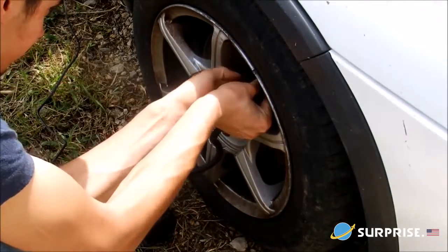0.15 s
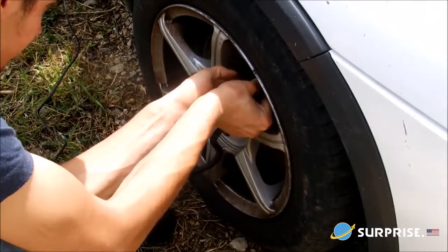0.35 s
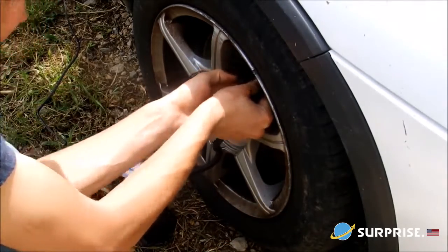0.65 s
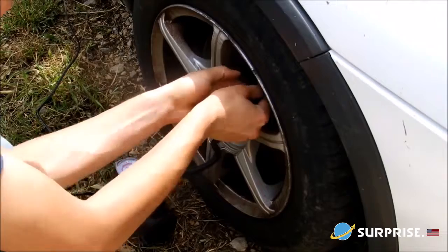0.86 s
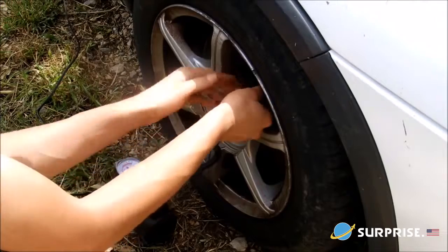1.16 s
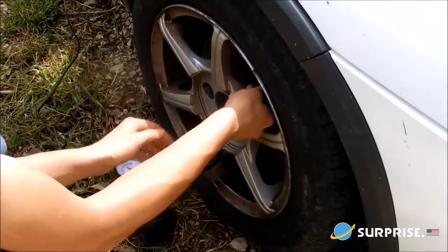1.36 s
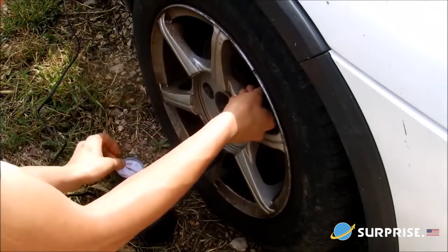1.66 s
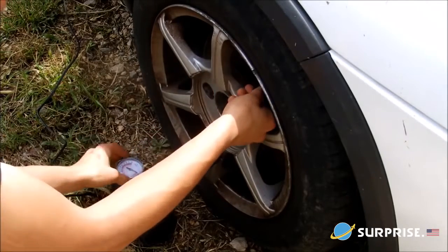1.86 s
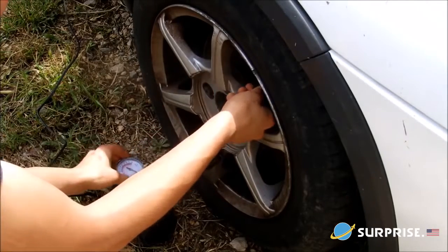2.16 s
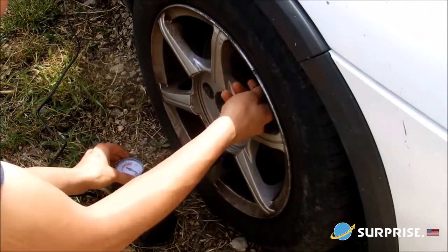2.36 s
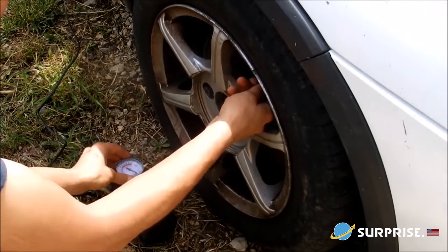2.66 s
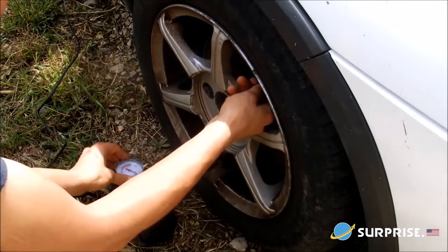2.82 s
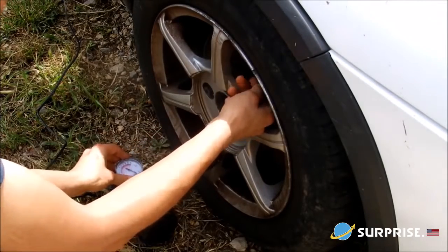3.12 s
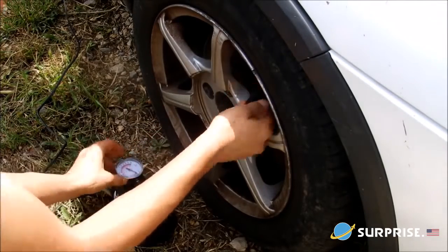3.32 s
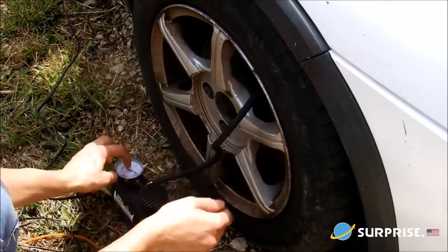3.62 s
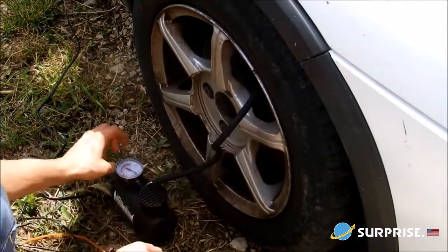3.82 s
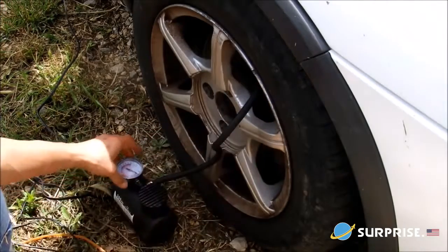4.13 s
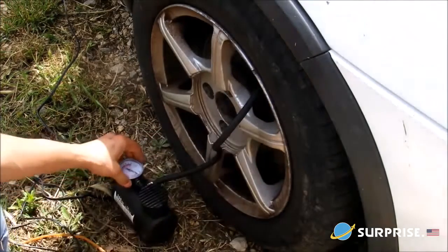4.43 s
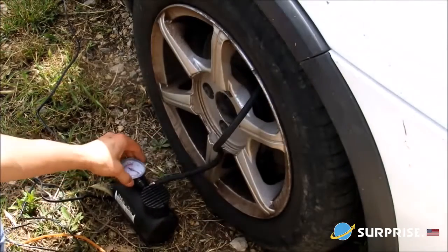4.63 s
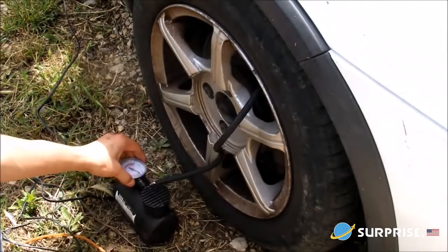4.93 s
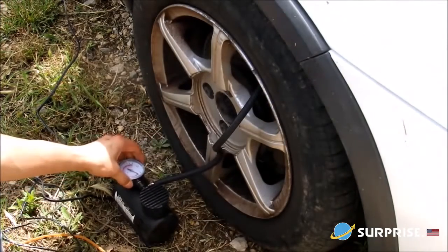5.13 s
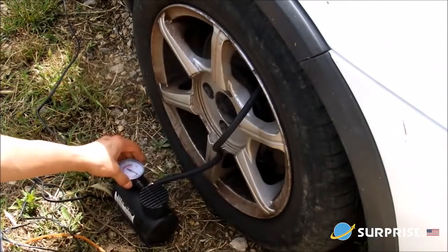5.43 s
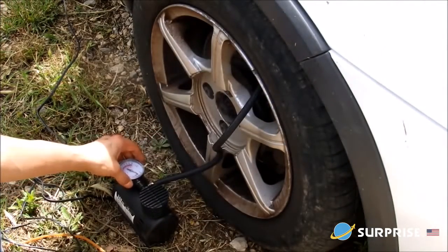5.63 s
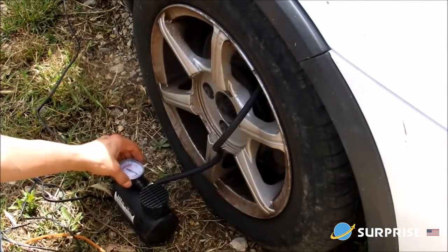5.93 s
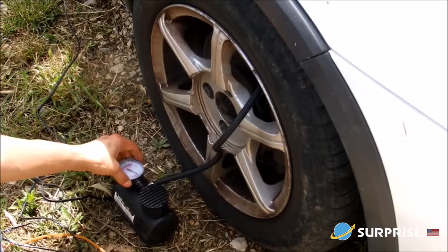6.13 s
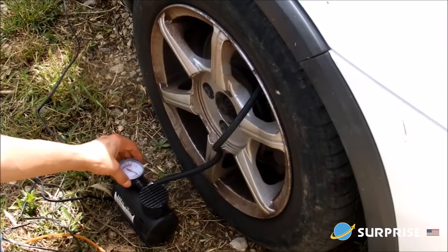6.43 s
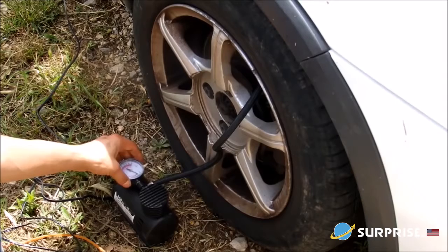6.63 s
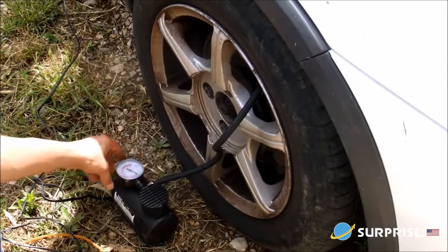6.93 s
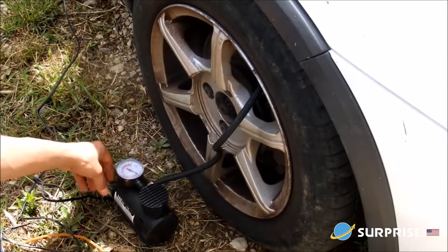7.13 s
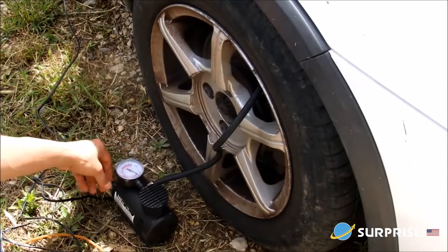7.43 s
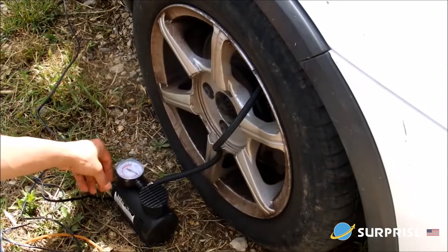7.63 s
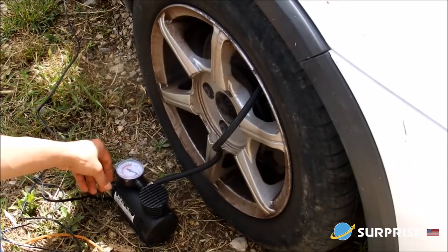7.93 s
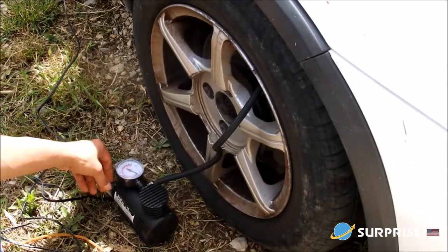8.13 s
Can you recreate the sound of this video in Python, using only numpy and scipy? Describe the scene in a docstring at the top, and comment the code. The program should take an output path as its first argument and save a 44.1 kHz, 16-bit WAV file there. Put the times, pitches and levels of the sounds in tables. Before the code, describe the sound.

Close, dry mono sound of a portable tyre inflator on open ground. Its nasal, clattering buzz never stops, slightly thicker at first and a little thinner after four seconds. Hands bump things softly, busiest around three and a half seconds, with low microphone rumbles; a hard hollow plastic knock makes the sound dip briefly before it recovers.

```python
"""A mini piston compressor pumps up a car tyre; someone crouches over it, then leans back.
A small motor drives its crank through a rattling gear pair: shaft-locked harmonics buzz, impulses of teeth,
piston and valve ring their resonances, and friction makes tone bursts chirp once a turn.
Hands make one sharp plastic knock and dull bumps; eddies rumble in buffets over steady low air.
The recorder's gain control ducks after loud peaks such as the knock."""
import sys
import numpy as np
from scipy import signal
from scipy.fft import rfft, irfft
from scipy.io import wavfile
from scipy.ndimage import uniform_filter1d, map_coordinates

SR = 44100
rng = np.random.default_rng(int(sys.argv[2]) if len(sys.argv) > 2 else 0)


def wrap_up_sound(samples):
    """Save the sound to the file named by the first command line argument, as 16-bit audio."""
    columns = np.atleast_2d(samples).T
    # keep every value between -1 and 1, then stretch to whole-number steps
    tamed = np.clip(columns, -1, 1)
    steps = np.round(tamed * 32767).astype(np.int16)
    wavfile.write(sys.argv[1], SR, steps)


N = 364707


def undb(db):
    """Level law: decibels to amplitude gain."""
    return 10 ** (np.asarray(db) / 20)


def curve(rows, axis=1):
    """Linear interpolation of one table column over time."""
    rows = np.asarray(rows, float)
    return np.interp(np.arange(N) / SR, rows[:, 0], rows[:, axis])


def unit(x):
    """Normalization to an rms of 1."""
    return x / np.sqrt(np.mean(x ** 2))


def walk(rate):
    """Band-limited random modulation: levels held for 1 / rate s, smoothed twice, rms 1."""
    hold = int(SR / rate)
    levels = rng.standard_normal(N // hold + 2)
    held = np.repeat(levels, hold)[rng.integers(hold):][:N]
    return unit(uniform_filter1d(uniform_filter1d(held, hold), hold))


def resonate(x, modes):
    """Minimum-phase filtering: steep resonances (f/Hz, width/Hz, level/dB), made causal by the cepstrum."""
    size = 4096
    f = np.arange(1, size // 2 + 2) * SR / size
    power = 0
    for hz, width, db in modes:
        detuning = (f * f - hz * hz) / (f * width)
        power = power + undb(db) ** 2 / (1 + detuning ** 2) ** 2
    cepstrum = irfft(np.log(power + 1e-13) / 2)
    # folding the cepstrum to positive times makes the response causal
    cepstrum[1:size // 2] *= 2
    cepstrum[size // 2 + 1:] = 0
    response = irfft(np.exp(rfft(cepstrum)))
    return signal.fftconvolve(x, response)[:N]


def blend(cover, covered, uncovered):
    """Linear weighting: the covered value at cover 1, the open value at cover 0."""
    return uncovered + cover * (covered - uncovered)


def shaded(x, modes, cover):
    """Modal filtering blended by cover; modes (f/Hz, width/Hz, level covered/dB, level open/dB)."""
    covered = resonate(x, [(hz, width, db) for hz, width, db, _ in modes])
    uncovered = resonate(x, [(hz, width, db) for hz, width, _, db in modes])
    return blend(cover, covered, uncovered)


def split(x, hz):
    """Complementary zero-phase crossover: the parts below and above a frequency."""
    low = signal.sosfiltfilt(signal.butter(3, hz, fs=SR, output="sos"), x)
    return low, x - low


def offset(turns, place):
    """Cyclic phase: signed distance in turns from the nearest passage of a crank place."""
    return (turns - place + .5) % 1 - .5


# slow level of the machine: (t/s, level/dB)
MACHINE_LEVEL = [(0, 1), (.45, -1.9), (.8, 0), (.96, -1.7), (1.1, -0.5), (1.5, 1), (1.65, -2.3), (1.75, .5),
                 (1.92, -1.7), (2.24, 0), (2.38, -2.5), (2.5, 0.6), (2.65, 0.5), (2.75, -3.5), (2.95, 0.2),
                 (3.07, -3), (3.25, 0), (3.75, -0.4), (3.9, 1.5), (4.05, 0.2), (4.6, 0.2), (5.0, 2),
                 (5.6, 0.3), (8.27, -0.1)]
# the treble follows a share of that level and has its own level under cover and in the open
TREBLE_SHARE, TREBLE_COVERED_DB, TREBLE_OPEN_DB = 0.38, -1.27, -0.64
# the middle and the treble waver by chance, each on its own
BODY_WAVER_DB, TREBLE_WAVER_DB, WAVER_PER_S = .5, .65, 10


def compressor(rattle_db=-0.64, crossover_hz=2700):
    """Superposition of crank-driven parts; nearby arms and body alter the spectrum, and the level wavers."""
    cover = body_cover()
    speed, turns = crank_motion()
    machine = buzz(turns, cover) + undb(rattle_db) * rattle(turns, cover)
    machine = machine + chirps(turns, speed, cover) + valve(turns, cover)
    slap_gain = undb(blend(cover, -2, -6))  # dB
    body, treble = split(machine + slaps(turns) * slap_gain, crossover_hz)
    level_db = curve(MACHINE_LEVEL)
    body_db = level_db + BODY_WAVER_DB * walk(WAVER_PER_S)
    treble_db = TREBLE_SHARE * level_db + blend(cover, TREBLE_COVERED_DB, TREBLE_OPEN_DB)
    treble_db = treble_db + TREBLE_WAVER_DB * walk(WAVER_PER_S)
    return body * undb(body_db) + treble * undb(treble_db)


# crank speed, nearly steady: (t/s, speed/turns per s)
CRANK_SPEED = [(0.0, 45.757), (0.2, 45.783), (1.7, 45.98), (3.3, 46.05), (4.0, 46.027), (4.5, 45.931),
               (4.9, 46.013), (5.45, 45.784), (5.8, 46.012), (6.1, 45.959), (6.4, 46.042), (7.35, 46.077),
               (7.9, 45.955), (8.27, 45.673)]
# crank angle at the start (turns) and teeth of the gear pair
CRANK_START, MOTOR_TEETH, CRANK_TEETH = -.258, 12, 51


def crank_motion():
    """Rotational kinematics: the crank angle is the time integral of its speed."""
    speed = curve(CRANK_SPEED)
    return speed, CRANK_START + np.cumsum(speed) / SR


# arms and body over the pump: (t/s, cover 0-1)
BODY_COVER = [(0, 1), (3.2, 0.85), (4.6, 0), (8.27, 0)]


def body_cover():
    """Shading and reflection: how far the person covers the pump, 0 to 1."""
    return np.clip(curve(BODY_COVER), 0, 1)


# the hand strains the hose: (t/s, pull 0-1)
HOSE_PULL = [(0, 0), (1.4, 0), (2.4, 1), (2.8, 1), (3.3, 0.98), (3.9, 0.45), (4.6, 0), (8.27, 0.1)]


def hose_pull():
    """Static load: the strain on the hose, 0 to 1."""
    return curve(HOSE_PULL)


def partial(turns, db, waver_db, waver_rate, phase_rad):
    """Phase-locked harmonic: one line tied to a shaft, amplitude-modulated at random."""
    amplitude = np.sqrt(2) * undb(db + waver_db * walk(waver_rate))
    return amplitude * np.cos(2 * np.pi * turns + phase_rad)


# piston harmonics: (multiple of the crank rate, level covered/dB, level open/dB)
PISTON_LINES = [(3, -64.5, -78), (4, -58, -59.5), (5, -59, -61), (6, -53, -56), (7, -57, -59),
                (8, -73, -61.5), (9, -43.5, -49.5), (10, -54, -53), (11, -49, -52), (12, -38.5, -40),
                (13, -42, -49.5), (14, -43, -46.5), (15, -35, -41.5), (16, -40.5, -46), (17, -46.5, -55),
                (18, -36, -41.5), (19, -60, -58), (21, -40, -45.5), (22, -46, -57), (23, -43.5, -60),
                (24, -37, -47), (25, -55, -47), (26, -51, -58), (27, -57, -58), (28, -39.5, -42.5),
                (30, -44, -70), (33, -54, -54), (34, -49, -67), (36, -38, -49.5), (38, -50, -54),
                (39, -51, -58), (41, -46.5, -45), (42, -45, -51.5), (53, -41, -46)]
# the multiple on a housing resonance sings out at first, then settles: extra level, decay time
SINGING_ORDER, SINGING_DB, SINGING_S = 24, 5, 2.9
# hum of the three-pole motor: (multiple of the shaft rate, level covered/dB, level open/dB)
MOTOR_LINES = [(3, -39.5, -45), (9, -59, -57)]
# the buzz slackens on the intake stroke: place and length in turns, depth dB
INTAKE_PLACE, INTAKE_LENGTH, INTAKE_DB = .54, .1, -4


def buzz(turns, cover):
    """Fourier synthesis: piston lines phased towards a knock at each slap, plus the faster motor shaft."""
    knock_lag_turns, smear_rad = .018, .2
    out = 0
    singing_db = SINGING_DB * np.exp(-(np.arange(N) / SR / SINGING_S) ** 2)
    for order, covered_db, open_db in PISTON_LINES:
        k = round(order)
        db = blend(cover, covered_db, open_db)
        if k == SINGING_ORDER:
            db = db + singing_db
        # each line takes the phase that the slaps would give it
        knocks = sum(undb(slap_db) * np.exp(-2j * np.pi * k * place) for place, slap_db in PISTON_SLAPS)
        phase = np.angle(knocks) + smear_rad * rng.standard_normal()
        out = out + partial(k * (turns - knock_lag_turns), db, waver_db=1.54, waver_rate=7, phase_rad=phase)
    out = out * undb(INTAKE_DB * np.exp(-(offset(turns, INTAKE_PLACE) / INTAKE_LENGTH) ** 2))
    shaft = turns * CRANK_TEETH / MOTOR_TEETH
    for order, covered_db, open_db in MOTOR_LINES:
        db = blend(cover, covered_db, open_db)
        phase = 2 * np.pi * rng.random()
        out = out + partial(round(order) * shaft, db, waver_db=1.0, waver_rate=9.4, phase_rad=phase)
    return out


# modulation of the rattle by each turn, one row a register: (upper f/Hz, load swing/dB,
# place of full swing/turns, valve spit/dB, spit place/turns); a negative swing is softest at its place
STROKE_DRIVE = [(1100, -1, 0.075, 1.5, 0.25), (1990, -2.5, 0.11, 5.5, 0.276), (3100, 1.5, 0.96, 6, 0.33),
                (5200, 1, .03, 0, 0.29), (9200, 3, 0.85, 7, 0.25), (20000, 1.5, 0.06, 2, 0.29)]
# resonances of housing and cylinder: (f/Hz, width/Hz, density level covered/dB re 1 per Hz,
# density level open/dB re 1 per Hz)
HOUSING_MODES = [(617, 427, -64, -67.5), (805, 88, -55.5, -60.5), (934, 69, -56, -57.5),
                 (1106, 238, -55.5, -60), (1297, 91, -56.5, -61), (1541, 81, -54.5, -58),
                 (1810, 460, -57.5, -62.5), (2378, 430, -58.5, -57.5), (2832, 520, -59.5, -63),
                 (3577, 350, -57.5, -58.5), (3800, 150, -58.5, -60.5), (4275, 460, -58.5, -62),
                 (4870, 430, -61, -62.5), (5250, 155, -56.5, -63.5), (5870, 1160, -64, -67),
                 (6960, 380, -69, -66), (7440, 190, -64, -64.5), (9920, 4900, -69.5, -70.5),
                 (11040, 2000, -68.5, -72.5), (14500, 890, -72.5, -72.5), (15620, 730, -80, -84)]


def rattle(turns, cover, spit_length=0.05, flicker_db=1.0):
    """Source-filter principle: gear noise, modulated by piston load and valve spit, rings the housing."""
    rest = gears(turns) * np.sqrt(SR / 2)  # a white source gets unit power per Hz
    drive = 0
    for top_hz, load_db, load_place, spit_db, spit_place in STROKE_DRIVE:
        band, rest = split(rest, min(top_hz, SR * .45))
        load = load_db * np.cos(2 * np.pi * (turns - load_place))
        spit = spit_db * np.exp(-(offset(turns, spit_place) / spit_length) ** 2)
        drive = drive + band * unit(undb(load + spit + flicker_db * walk(60)))
    return shaded(drive, HOUSING_MODES, cover)


def gears(turns, mesh_db=-7, air_db=-1, backlash_teeth=.45, slip_turns=0.0012):
    """Meshing: teeth clack unevenly, worn faces scrape alike when a pair meets again, and air rushes."""
    tooth_count = np.floor(turns * CRANK_TEETH + backlash_teeth * walk(1500))
    clacks = (np.diff(tooth_count, prepend=0) > 0) * rng.standard_normal(N)
    # crank turns until the same teeth meet again
    period = MOTOR_TEETH // np.gcd(MOTOR_TEETH, CRANK_TEETH)
    faces = rng.standard_normal(size=3600)
    angle = (turns + slip_turns * walk(30)) / period % 1
    scrape = map_coordinates(faces, [angle * len(faces)], order=3, mode="grid-wrap")
    air = rng.standard_normal(N)
    return unit(unit(clacks) + undb(mesh_db) * unit(scrape) + undb(air_db) * air)


# chirps of the piston seal in every turn: (f/Hz, place/turns, length/turns, level covered/dB,
# level open/dB, change at full pull on the hose/dB)
SEAL_CHIRPS = [(1250, .28, 0.083, -47, -47, 7.5), (1570, .58, 0.05, -48, -52, 8),
               (1890, .26, 0.065, -51, -56, 14), (1910, 0.0798, 0.077, -60, -44, 2),
               (2398, 0.842, 0.08, -57, -36.5, 4), (2850, 0.81, 0.096, -44, -50, -2.5),
               (3460, .81, 0.027, -50, -44, 10.5), (3670, .25, .04, -47, -43.5, 6),
               (3583, 0.0192, 0.059, -45.5, -39, 8.5), (5210, .28, 0.051, -45, -45.5, 0),
               (7043, .91, 0.087, -40, -38.5, -4.5)]


def chirps(turns, speed, cover, slip_rad=0.3, scatter_db=1.6, drift_db=.9, detune=0.0042):
    """Friction tones: bursts restart at a fixed crank angle, varying in phase, pitch and size each turn."""
    out, pull = 0, hose_pull()
    for hz, place, length, covered_db, open_db, pull_db in SEAL_CHIRPS:
        lag = offset(turns, place)
        stroke = np.floor(turns - place + .5).astype(int) + 2
        slip, size, bend = rng.standard_normal((N // 100, 3))[stroke].T
        pitch = hz * (1 + detune * bend)
        tone = np.sin(2 * np.pi * pitch * lag / speed + slip_rad * slip)
        envelope = np.exp(-.5 * (lag / length) ** 2)
        burst = unit(tone * envelope * undb(scatter_db * size + drift_db * walk(3.86)))
        out = out + burst * undb(blend(cover, covered_db, open_db) + pull * pull_db)
    return out


def taps(turns, places, jitter_turns, scatter_db):
    """Periodic impulses: a sharp tap at each (place/turns, level/dB), uneven in time and strength."""
    angle, width_turns = turns + jitter_turns * walk(50), .0012
    out = 0
    for place, db in places:
        pulse = np.exp(-(offset(angle, place) / width_turns) ** 2)
        out = out + undb(db) * unit(pulse * undb(scatter_db * walk(70)))
    return out


# the valve snaps and bounces in every turn: (place/turns, relative level covered/dB, relative level open/dB)
VALVE_SNAPS = [(.925, -12, -2), (.985, 0, 0), (.0255, -8, -9), (.0814, -7, -10), (.1118, -2, -3)]
# ring of the valve: (f/Hz, width/Hz, relative level covered/dB, relative level open/dB)
VALVE_RING = [(4343, 165, 9, 2.5), (4500, 1100, -1.5, -4), (4750, 88, 8, 6), (5440, 1250, -7.5, -10.5)]


def valve(turns, cover, valve_db=-32.0, pull_db=-1.5):
    """Impact excitation: the valve snaps, bounces and rings briefly, softer while the hose is strained."""
    snaps = [(place, blend(cover, covered_db, open_db)) for place, covered_db, open_db in VALVE_SNAPS]
    struck = taps(turns, snaps, jitter_turns=.001, scatter_db=1.8)
    ring = unit(shaded(struck, VALVE_RING, cover))
    return undb(valve_db + pull_db * hose_pull()) * ring


# the piston slaps in its bore: (place/turns, relative level/dB)
PISTON_SLAPS = [(.175, -37), (.825, -40)]
# ring of a slap: (f/Hz, width/Hz, relative level/dB)
SLAP_RING = [(660, 190, 1), (866, 300, 0), (1116, 158, 4.5), (1720, 390, -0.5)]


def slaps(turns, slap_db=-34):
    """Impact excitation: play in the piston gives a hard and a softer knock in each turn."""
    struck = taps(turns, PISTON_SLAPS, jitter_turns=.008, scatter_db=1.4)
    return undb(slap_db) * unit(resonate(struck, SLAP_RING))


def add(out, s, sound):
    """Superposition: mix a short sound in at a time in seconds."""
    start = min(int(s * SR), N - 1)
    out[start:start + len(sound)] += sound[:N - start]


# sharp knock on plastic and its bounces: (t/s, level/dB, hardness/dB)
PLASTIC_KNOCKS = [(5.1127, 3, -21), (5.1203, -9, -14), (5.1253, -5, -4), (5.134, -9, -20)]
# decaying modes of the knock: (f/Hz, relative level/dB, 60 dB decay time/s)
KNOCK_RING = [(600, -24, .04), (1110, -13, .045), (1290, -6, .013), (1560, -16, .035), (2600, -22, .006)]


def plastic_knock(contact_s=.0004, crack_s=.0012):
    """Modal decay: hollow plastic rings after a noisy crack, softened by the contact time."""
    out, t = np.zeros(N), np.arange(SR // 10) / SR
    ring = sum(undb(db - 60 * t / t60) * np.sin(2 * np.pi * hz * t) for hz, db, t60 in KNOCK_RING)
    onset = 1 - np.exp(-t / contact_s)
    for s, db, hard_db in PLASTIC_KNOCKS:
        noise = uniform_filter1d(rng.standard_normal(len(t)), size=4)
        crack = undb(hard_db) * np.exp(-t / crack_s) * noise
        add(out, s, undb(db) * (ring + crack) * onset)
    return out


def thump(t, hz, length):
    """Damped oscillation whose envelope peaks after one length."""
    return t / length * np.exp(1 - t / length) * np.sin(2 * np.pi * hz * t)


# dull handling bumps: (t/s, envelope peak level/dB, f/Hz, time to the envelope peak/s)
HANDLING_BUMPS = [(1.722, -35, 146, 0.0075), (1.728, -34, 273, 0.006), (2.004, -38, 130, 0.0045),
                  (2.072, -37, 110, .005), (2.105, -42, 190, .004), (2.446, -35, 150, 0.0027),
                  (3.217, -21, 228, 0.0027), (3.237, -26, 260, .002), (3.284, -26, 110, .005),
                  (3.315, -16, 228, 0.0016), (3.323, -21, 160, .005), (3.336, -25, 285, .005),
                  (3.356, -22, 238, 0.0053), (3.3955, -14, 337, 0.0015), (3.404, -25, 290, .002),
                  (3.51, -14, 307, .0016), (3.53, -22, 290, .002), (3.544, -16.5, 480, .0015),
                  (3.556, -15, 306, .0022), (3.565, -19, 402, 0.0017), (3.578, -27, 328, .002),
                  (3.644, -19, 278, 0.0014), (3.651, -27, 290, 0.0013), (3.708, -31, 330, .003),
                  (3.746, -30, 270, .002), (3.77, -29, 250, 0.0016), (3.917, -35, 150, .004),
                  (4.135, -40, 140, .004), (4.285, -36, 130, .005), (4.562, -32, 115, .005),
                  (5.392, -31, 149, 0.006), (5.634, -39, 181, .004), (5.725, -30, 220, .003),
                  (5.8258, -17.5, 660, 0.0016), (5.828, -12.5, 430, 0.002), (5.841, -19, 476, 0.0023),
                  (5.892, -24, 135, 0.0032), (5.96, -35, 130, 0.004), (6.668, -40, 120, .004),
                  (6.716, -44, 129, .004), (7.18, -34, 109, .006), (7.46, -29, 138, 0.0028),
                  (7.592, -38, 170, 0.0057), (7.735, -24, 180, 0.0034), (7.815, -28, 170, 0.0025),
                  (8.06, -46, 98, .005)]
# overtone of a bump: its pitch ratio and level
OVERTONE_RATIO, OVERTONE_DB = 1.8, -9


def bumps():
    """Damped oscillation: each soft bump has a low tone and a shorter overtone."""
    out, t = np.zeros(N), np.arange(SR // 10) / SR
    for s, db, hz, length in HANDLING_BUMPS:
        overtone = undb(OVERTONE_DB) * thump(t, OVERTONE_RATIO * hz, length / 2)
        add(out, s, undb(db) * (thump(t, hz, length) + overtone))
    return out


# colour of the rumble: (f/Hz, width/Hz, relative level/dB)
RUMBLE_COLOUR = [(71.6, 60, -1.5), (130, 150, 1), (290, 300, -7.5)]
# low buffets on the microphone: (t of the peak/s, length/s, peak level/dB)
MICROPHONE_BUFFETS = [(1.735, .04, -49), (2.07, 0.13, -47), (2.52, 0.28, -47), (3.1, 0.24, -41),
                      (3.22, 0.045, -31), (3.363, 0.17, -30.5), (3.556, 0.07, -35), (3.715, .04, -37),
                      (3.77, .04, -37), (3.9, .06, -48), (4.18, .08, -51), (4.565, .04, -36),
                      (4.92, .12, -49), (5.4, 0.037, -32), (5.637, 0.032, -38), (5.766, .08, -42),
                      (5.894, 0.045, -32.5), (5.967, .06, -38), (6.71, 0.11, -48), (7.18, 0.11, -48),
                      (7.484, 0.12, -41), (7.61, 0.083, -42), (7.75, 0.052, -35), (8.07, .05, -40)]
# faint rumble between the buffets, once the hands start to move: start, level, random swing and its rate
LULL_START_S, LULL_DB, LULL_SWING_DB, LULL_PER_S = 1.7, -60.5, 0.5, 5.8
# steady low outdoor air
AIR_DB = -59


def rumble(flutter_db=2, steadiness=.5):
    """Turbulence: fluttering eddies on the microphone, faint in the lulls, swelling in each buffet."""
    t = np.arange(N) / SR
    eddies = resonate(rng.standard_normal(N), RUMBLE_COLOUR)
    strength = np.sqrt(uniform_filter1d(eddies ** 2, size=1500))
    # part of the natural unevenness is levelled out before the flutter is put on
    eddies = eddies / strength ** steadiness * undb(flutter_db * walk(60))
    buffets = sum(undb(db) * np.exp(-(2 * (t - s) / length) ** 2) for s, length, db in MICROPHONE_BUFFETS)
    lull = (t > LULL_START_S) * undb(LULL_DB + LULL_SWING_DB * walk(LULL_PER_S))
    return unit(eddies) * np.sqrt(buffets ** 2 + lull ** 2 + undb(AIR_DB) ** 2)


def scene():
    """Linear superposition of compressor, handling noises and rumble, in mono."""
    return (compressor() + plastic_knock() + bumps() + rumble())[None]


# gain control: threshold dB, deepest duck dB, release dB per s, reaction time s
THRESHOLD_DB, DEEPEST_DB, RELEASE_DB_PER_S, REACTION_S = -15, 8.3, 23, .02
TOP_HZ = 15750


def record(dry):
    """Dynamic compression: gain ducks just after a loud peak and creeps back; a low-pass cuts the top."""
    x, t = dry[0], np.arange(N) / SR
    level_db = 10 * np.log10(np.abs(uniform_filter1d(x * x, size=100)) + 1e-12)
    over_db = np.clip(2 * (level_db - THRESHOLD_DB), 0, DEEPEST_DB)
    # peak hold that falls at the release rate
    release_db = RELEASE_DB_PER_S * t
    held_db = np.maximum.accumulate(over_db + release_db) - release_db
    duck_db = uniform_filter1d(np.interp(t - REACTION_S, t, held_db), size=500)
    lowpass = signal.ellip(10, .2, 80, TOP_HZ, fs=SR, output="sos")
    return signal.sosfilt(lowpass, dry * undb(-duck_db))


dry = scene()
out = record(dry)
wrap_up_sound(out)
```